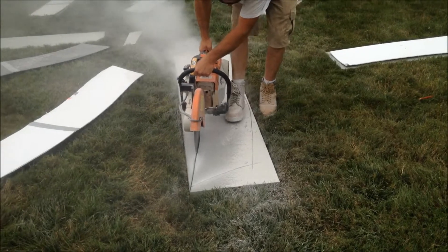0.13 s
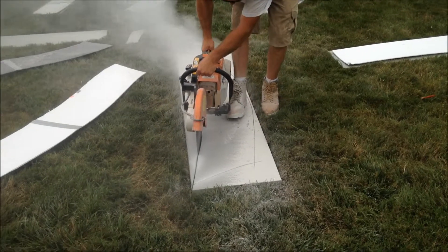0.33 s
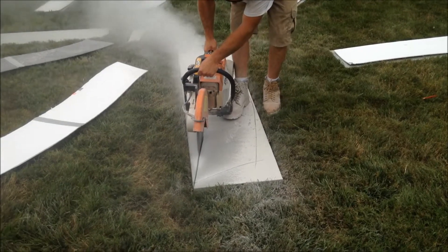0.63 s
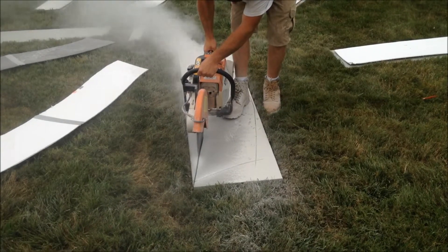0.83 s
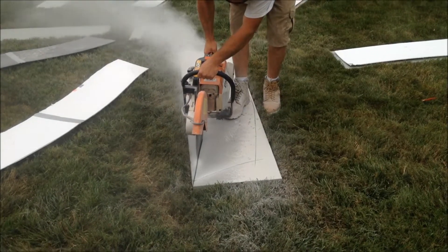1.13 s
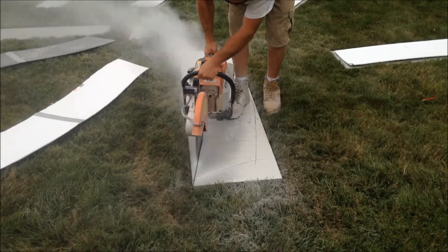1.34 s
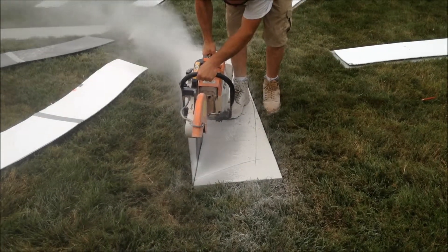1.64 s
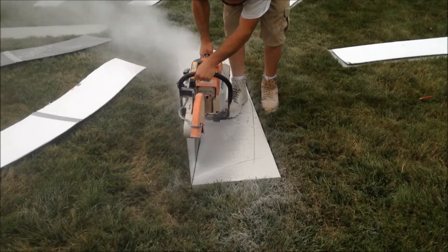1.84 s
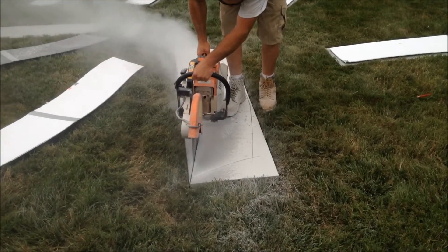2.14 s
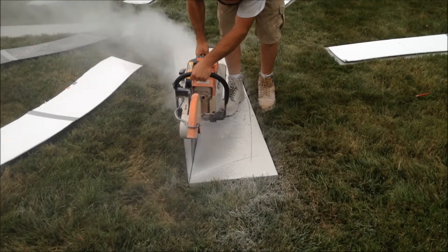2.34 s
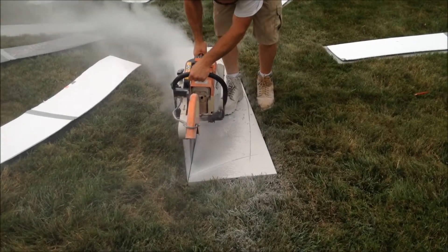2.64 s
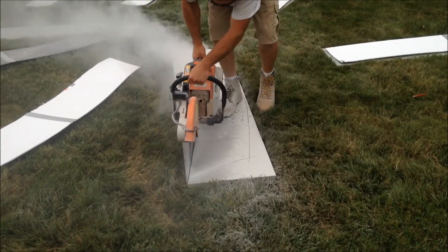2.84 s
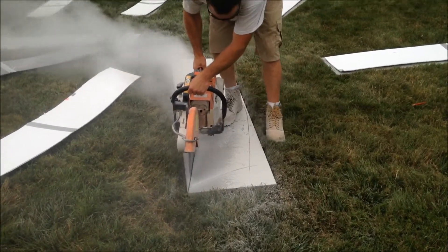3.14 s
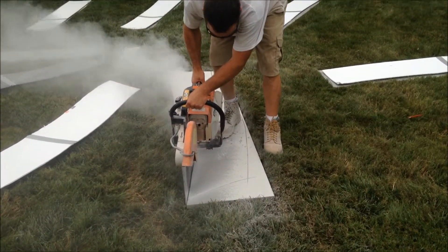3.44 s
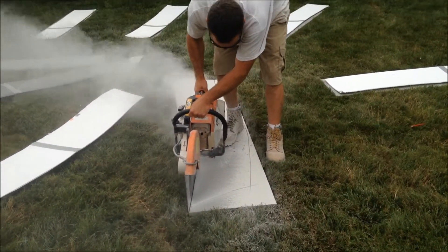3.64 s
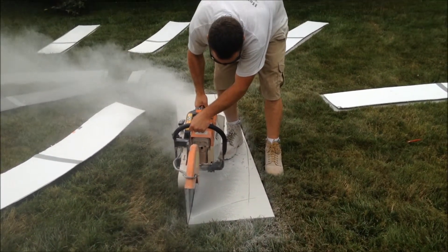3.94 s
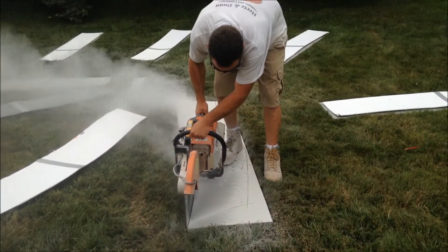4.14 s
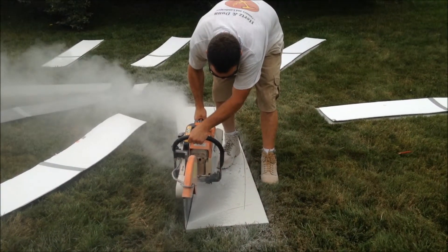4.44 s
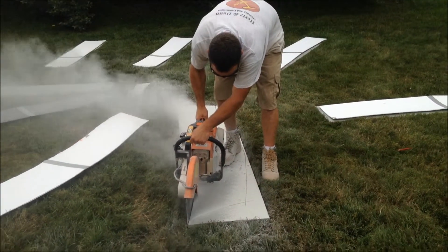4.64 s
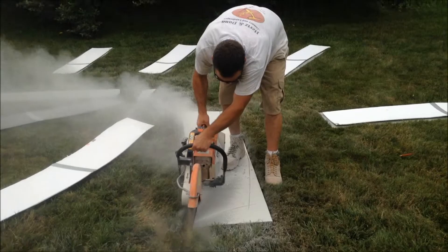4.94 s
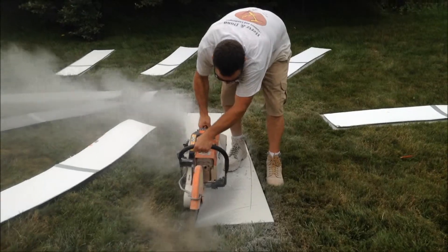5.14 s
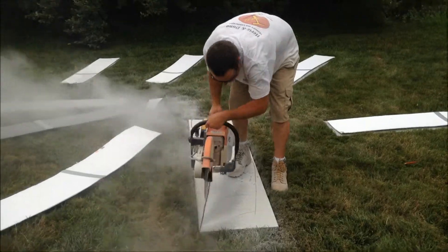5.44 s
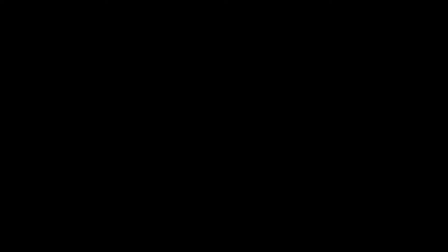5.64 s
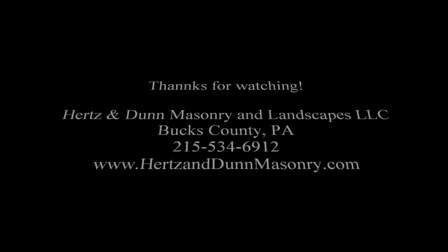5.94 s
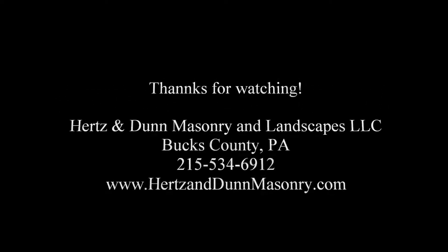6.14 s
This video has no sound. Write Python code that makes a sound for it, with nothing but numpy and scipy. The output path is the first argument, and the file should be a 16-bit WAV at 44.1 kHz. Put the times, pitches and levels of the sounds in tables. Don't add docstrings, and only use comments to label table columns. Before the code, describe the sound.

From 0 s a two-stroke cut-off saw is at full throttle, grinding a stone slab on open grass about two metres from a mono camera microphone. A harsh, noisy scream centred around 3 to 4 kHz dominates, with a rough low engine throb near 160 Hz, a buzzing slab rattle and a fine high grit hiss. The pitch stays almost constant, bending slightly with load; the push eases briefly near 1.4 s, and ringing tones swell and shift. From about 3.3 s everything fades steadily. Around 4.9 s the blade snags with a short rattle, then the cutting eases near 5 s. At about 5.4 s the blade leaves the stone: the scream drops away, leaving a faint, quickly dying metallic ring and a slowing motor. Two soft low handling bumps come near 5.5 s, the sound breaks off around 5.65 s, and silence remains from 5.7 s.

```python
import sys
import numpy as np
from scipy import signal
from scipy.fft import rfft, irfft, next_fast_len
from scipy.io import wavfile
from scipy.ndimage import uniform_filter1d, map_coordinates

SR = 44100
rng = np.random.default_rng(int(sys.argv[2]) if len(sys.argv) > 2 else 0)


def ratio_of_db(decibels):
    return 10 ** (np.asarray(decibels, float) / 20)


def pcm_store(signal):
    levels = np.round(np.clip(np.atleast_2d(signal), -1, 1) * 32767)
    wavfile.write(sys.argv[1], SR, levels.astype(np.int16).T)


N = 277817

# multiple_of_blade_turn, level_db
SHAFT_ORDERS = [(1, -17), (2, 2.5), (3, -14.5), (4, 0), (5, -13.5), (6, -13.5), (7, -13), (8, 2.5),
                (9, -11), (10, -6.5), (11, -12.5), (12, -12.5), (13, -22), (14, 3), (15, -9.5), (16, -15),
                (17, -8.5), (18, -11.5), (19, -26.5), (20, -12.5), (21, -7), (22, 1.5), (23, -4.5),
                (24, -22), (25, -17.5), (26, -19), (27, -9.5), (28, -14), (29, -4), (30, -18)]
FIRING_ORDERS = (2, 4)
LIFT_S, LIFT_TAKES_S = 5.37, 0.025
RUNDOWN_DB_PER_S = -16


def level(x, db=0):
    return x * ratio_of_db(db) / np.sqrt(np.mean(x ** 2))


def walk(rate, count=N):
    step = 32
    hold, points = max(int(SR / step / rate), 1), N // step + 2
    coarse = np.repeat(rng.standard_normal(points // hold + 1), hold)
    coarse = uniform_filter1d(uniform_filter1d(coarse, hold), hold)[:points]
    at = np.arange(N - count, N, dtype=np.float32) / step
    return 1.33 * np.interp(at, np.arange(points), coarse)


def hump(t, middle_s, long_s):
    return np.exp(-(2 * (t - middle_s) / long_s) ** 4)


def colour(x, points, peaks=()):
    size = next_fast_len(N)
    hz = np.arange(1, size // 2 + 2) * SR / size
    at, db = np.transpose(points)
    db = np.interp(np.log(hz), np.log(at), db, left=-70, right=-70)
    for centre, width, lift_db in peaks:
        db = db + lift_db / (1 + (2 * (hz - centre) / width) ** 2)
    return level(irfft(rfft(x, size) * ratio_of_db(db), size)[:N])


def scrape(turns, lasts, repeat):
    around = 512
    rim = rng.standard_normal((600, around))
    fading = np.exp(-1 / max(lasts, 1))
    start = rim[:1] / np.sqrt(1 - fading ** 2)
    rim = signal.lfilter([1], [1, -fading], rim, axis=0, zi=start)[0]
    rim = np.hstack([rim, rim[:, :1]])
    pattern = map_coordinates(rim, [turns, turns % 1 * around], order=1)
    repeat = np.clip(repeat, 0, 1)
    return np.sqrt(repeat) * level(pattern) + np.sqrt(1 - repeat) * rng.standard_normal(N)


def throb(turns, wobble, firing):
    return 1 + wobble * np.cos(2 * np.pi * turns) + firing * np.cos(4 * np.pi * turns + 1)


def lines(turns, orders, drift_db, rate=6.0, spread=0.36):
    total = 0
    count = len(turns)
    for order, db in orders:
        gain = ratio_of_db(np.float32(db + drift_db * walk(rate, count)))
        phase = 2 * np.pi * ((order * turns + spread * rng.random()) % 1)
        phase = phase + 0.18 * drift_db * walk(1.5 * rate, count)
        total = total + gain * np.cos(np.float32(phase))
    return total


def patchy(x, depth_db, hz_wide, seconds):
    size = 1024
    hz, s, z = signal.stft(x, SR, nperseg=size)
    shade = rng.standard_normal(z.shape)
    for axis, cells in enumerate((hz_wide / hz[1], seconds / (s[1] - s[0]))):
        span = max(int(cells), 1)
        shade = uniform_filter1d(uniform_filter1d(shade, span, axis), span, axis)
    shaded = z * ratio_of_db(depth_db * shade / shade.std())
    return level(signal.istft(shaded, SR, nperseg=size)[1][:N])


def blade_scream(t, turns, push_db):
    # frequency_hz, density_db
    rim = [(1120, -30), (1900, -11.5), (2070, -20.5), (2330, -10.5), (2690, -10.5), (2860, -10), (3190, 1),
           (3590, 0), (4100, -4.5), (4940, -14), (5540, -14.5), (6070, -16), (6840, -24), (7270, -30.5),
           (8000, -23), (10400, -51), (17600, -120)]
    # frequency_hz, width_hz, lift_db
    plate = [(2960, 80, 2), (3300, 72, 1), (3658, 200, 5), (4055, 99, 6.5), (4580, 60, 6), (6004, 320, 7.5),
             (6850, 163, 9)]
    # multiple_of_blade_turn, level_db
    segments = [(38, -2.5), (40, -0.5), (41, -1.5), (42, 1.5), (44, 4), (45, -2), (46, -2), (48, -4),
                (50, -3.5)]
    friction = scrape(turns, lasts=17.6, repeat=0.29) * throb(turns, wobble=0.05, firing=0.055)
    scream = patchy(colour(friction, rim, plate), depth_db=1.1, hz_wide=129.2, seconds=0.04)
    whine = level(lines(turns, segments, drift_db=2.0, spread=0.85), -8.0)
    scream = level(scream + whine, 0.3)
    buried_db = -0.6 * t
    exit_db = -1.5 * hump(t, LIFT_S, 0.42)
    return ratio_of_db(-11 + 0.25 * push_db + buried_db + exit_db + 0.46 * walk(24)) * scream


def ring_db(t, order, rest_db):
    # order, middle_s, length_s, change_db
    changes = [(8, .1, 0.92, -4.5), (14, .05, 1.5, -7), (10, .55, 1.3, 7), (10, 3.05, 0.59, 4),
               (10, 3.5, .55, 5), (10, 4.45, .6, -5.5), (10, 4.6, .3, 10), (14, 4.0, 0.36, 3.5),
               (8, 5.25, .15, -8), (4, 5.07, 0.48, 3.5), (22, .33, .15, 7.5), (22, .56, .12, 5),
               (22, .8, .15, 8.5), (22, 1.25, .3, 4), (8, 1.6, .3, 2.5), (22, 2.05, 0.29, 3),
               (8, 2.46, .3, -3.5), (22, 3.0, .7, 4), (5, 3.15, 1.2, 3.5), (5, 4.1, 0.56, 14),
               (22, 4.02, .15, -4), (22, 4.45, 0.58, 3), (5, 4.48, 0.089, 13.5), (8, 4.7, 1.2, -3.5),
               (5, 4.86, .12, 12), (5, 5.15, 0.34, 14), (22, 5, 0.88, -4)]
    slow = t[::64]
    db = np.full(len(slow), rest_db, float)
    for k, middle_s, long_s, change_db in changes:
        if round(k) == order:
            db += change_db * hump(slow, middle_s, long_s)
    return np.interp(t, slow, db)


def slab(t, turns, push_db):
    # frequency_hz, density_db
    body = [(25, -33), (60, -22), (120, -12.5), (300, -11), (600, -9), (1000, -7), (1400, -5), (1800, 0),
            (2100, -4), (2600, -6), (3200, -6.5)]
    swelling = (5, 8, 10, 14, 22)
    resting = (-41.5, -28.5, -38, -26.5, -31)
    beside = (21, 23)
    others = [row for row in SHAFT_ORDERS if row[0] not in (*FIRING_ORDERS, *swelling, *beside)]
    loose = lines(turns, others[:9], drift_db=1.6, spread=0.67)
    loose = loose + lines(turns, others[9:], drift_db=1.8, rate=4.0)
    rattle = scrape(turns, lasts=5.7, repeat=0.3) * throb(turns, wobble=0.33, firing=0.38)
    snag_db = 5.5 * hump(t, 4.88, 0.11)
    shaken = ratio_of_db(-4.5) * loose + ratio_of_db(-3.0 + snag_db) * colour(rattle, body)
    rings = [(k, ring_db(t, k, db)) for k, db in zip(swelling, resting)]
    ringing = lines(turns, rings[:-1], drift_db=1.0, spread=0.62)
    struck = [(swelling[-1], 2.5), (beside[0], -2.8), (beside[1], -3.8)]
    ringing = ringing + ratio_of_db(rings[-1][1]) * lines(turns, struck, drift_db=1.4, spread=0.064)
    return ratio_of_db(-21.5 + 0.3 * push_db) * shaken + ringing


def engine(t, turns, push_db):
    orders = [(k, ring_db(t, k, db)) for k, db in SHAFT_ORDERS if k in FIRING_ORDERS]
    firing = lines(turns, orders, drift_db=0.3) * ratio_of_db(-1.1)
    return ratio_of_db(-27.5 + 0.1 * push_db) * firing


def free_run(turns, since):
    # multiple_of_firing_rate, level_db
    firing = [(1, -15), (2, -4), (5, -9), (6, -8), (7, -1.5), (8, -7), (13, -11), (14, -7), (18, -4),
              (20, -2), (21, 1), (22, -2), (24, -1), (25, -6), (26, -1)]
    # frequency_hz, density_db
    fan = [(25, -30), (60, -23), (200, -17), (500, -19), (1100, -10.5), (1650, -13), (2050, -6),
           (2480, -24), (2800, -11), (3250, -9), (4050, -4), (4450, -14), (5000, -21.5), (9000, -40)]
    last = SR
    uneven = (2 * turns + 0.0015 * walk(60))[-last:]
    orders = level(lines(uneven, firing, drift_db=1.5, rate=11.0, spread=0.66), -4.0)
    air = ratio_of_db(-6.0) * colour(rng.standard_normal(N), fan)
    return ratio_of_db(-17.5 + 1.5 + RUNDOWN_DB_PER_S * since) * (np.pad(orders, (N - last, 0)) + air)


def blade_ring(t, since):
    hz, t60_s = 3960, 0.38
    decay = ratio_of_db(-17 - 60 * since / t60_s + 3 * walk(40))
    return decay * np.sin(2 * np.pi * hz * t + walk(50))


def grit_spray(turns, push_db, lifted, since):
    # frequency_hz, density_db
    hiss = [(3820, -28.5), (6500, -2.5), (6850, -4.5), (7460, -12.5), (9010, -13.5), (11000, -22),
            (13700, -18.5), (15200, -22)]
    grit = scrape(turns, lasts=5.0, repeat=0.093) * throb(turns, wobble=0.0299, firing=0.072)
    grit = colour(grit * ratio_of_db(0.66 * walk(300)), hiss)
    grit = patchy(grit, depth_db=2.5, hz_wide=130.4, seconds=0.04)
    return ratio_of_db(-27.5 + push_db - 13 * lifted + RUNDOWN_DB_PER_S * since + 0.5 * walk(16)) * grit


def camera_bumps(t):
    # middle_s, level_db, pitch_hz
    touches = [
        (5.518, -35, 70),
        (5.544, -48, 110),
    ]
    total = 0
    for s, db, hz in touches:
        total = total + ratio_of_db(db) * np.exp(-((t - s) * hz / 0.5) ** 2) * np.sin(-2 * np.pi * hz * (t - s))
    return total


def fade_out(t):
    # time_s, gain_db
    ending = [
        (5.6, 0),
        (5.611, 4),
        (5.614, -19),
        (5.644, -9),
        (5.648, -44),
        (5.7, -52),
        (5.705, -120),
    ]
    from_s, to_s = 3.3, 5.723
    fade = np.clip((to_s - t) / (to_s - from_s), 0, 1) ** 0.99
    return fade * ratio_of_db(np.interp(t, *np.transpose(ending)))


def blade_turns(t):
    # time_s, turns_hz
    speeds = [(0, 81.2), (.45, 80.36), (.65, 80.62), (1.1, 80.54), (1.3, 80.73), (1.45, 81.12),
              (1.75, 81.22), (1.95, 81.0), (2.1, 80.61), (2.4, 80.45), (3.25, 80.6), (3.4, 80.47),
              (3.9, 81.03), (4.3, 81.14), (4.7, 81.07), (4.9, 80.33), (5.1, 80.68), (5.32, 80.94)]
    speed = np.interp(t, *np.transpose(speeds)) - 13.8 * np.clip(t - 5.34, 0, None)
    return np.cumsum(speed * (1 + 0.0005 * walk(25))) / SR


def scene():
    # time_s, push_db
    push = [(0, -1.5), (.36, 1), (.5, -2), (.75, .6), (1.29, 0.5), (1.37, -5), (1.56, -0.3), (1.87, -1.8),
            (2.0, 1.5), (2.4, 0.5), (3.17, 0.7), (3.6, -3.5), (3.87, -0.5), (4.54, -3), (4.76, 1.5),
            (4.88, -3), (4.99, -7.5), (5.27, -0.3)]
    t = np.arange(N) / SR
    push_db = np.interp(t, *np.transpose(push))
    lifted = np.clip((t - LIFT_S) / LIFT_TAKES_S, 0, 1)
    since = np.clip(t - LIFT_S, 0, None)
    turns = blade_turns(t)
    cut = blade_scream(t, turns, push_db) + slab(t, turns, push_db) + engine(t, turns, push_db)
    saw = cut * ratio_of_db(-16 * lifted)
    saw = saw + lifted * (free_run(turns, since) + blade_ring(t, since))
    saw = saw + grit_spray(turns, push_db, lifted, since)
    saw = saw * fade_out(t) + camera_bumps(t)
    return np.array([saw, saw])


def top_cut(x):
    return signal.sosfilt(signal.butter(12, 15310, fs=SR, output="sos"), x)


def record(dry):
    ceiling = 1.05
    mix = ceiling * np.tanh(dry / ceiling)
    return top_cut(mix)


dry = scene()
out = record(dry)
pcm_store(out)
```